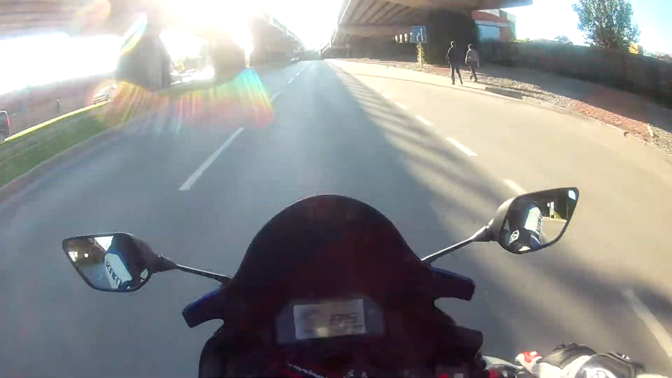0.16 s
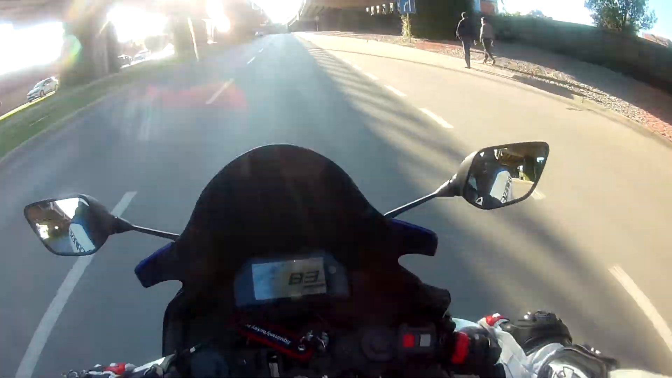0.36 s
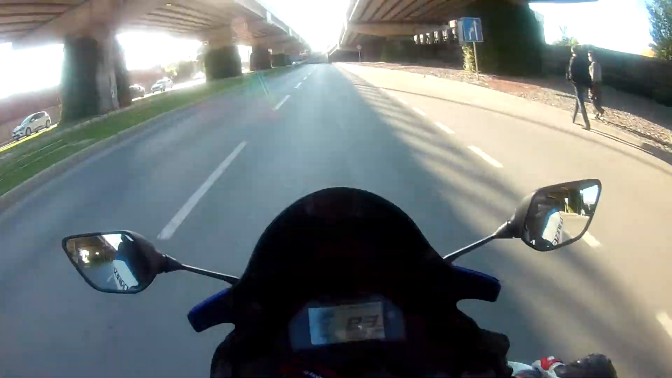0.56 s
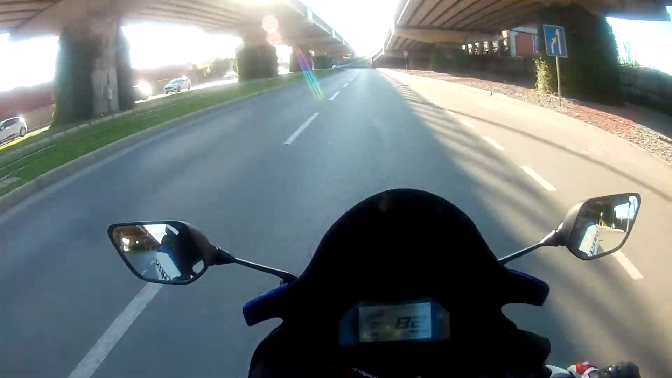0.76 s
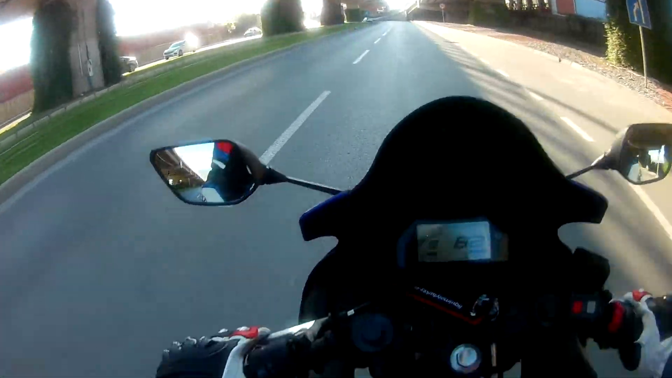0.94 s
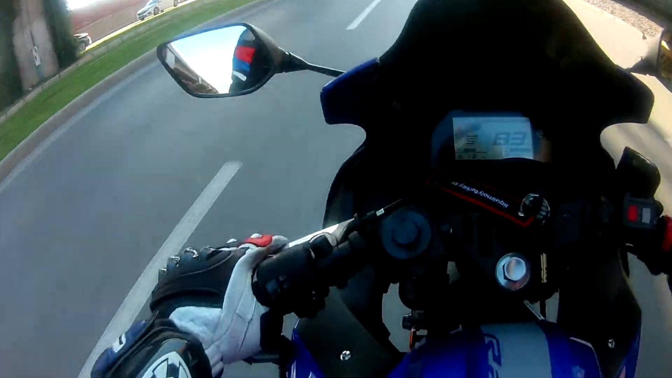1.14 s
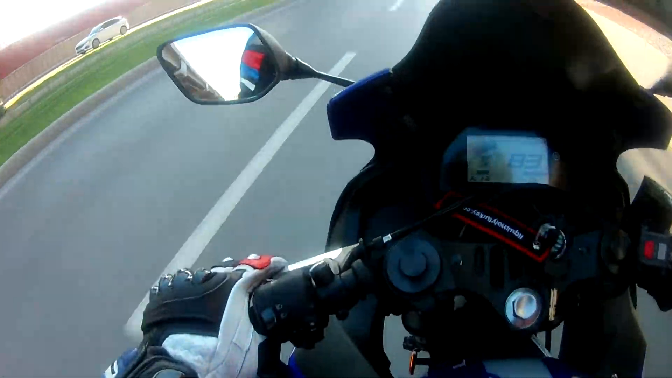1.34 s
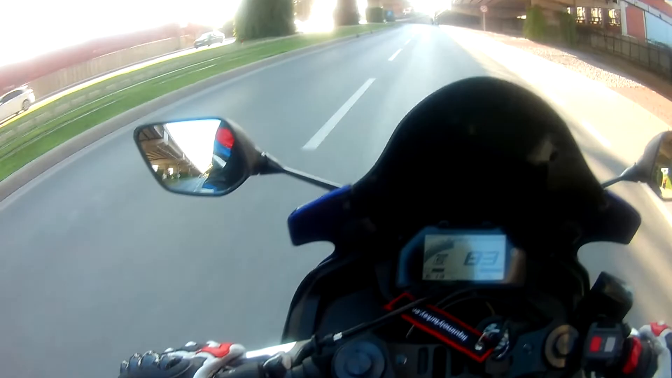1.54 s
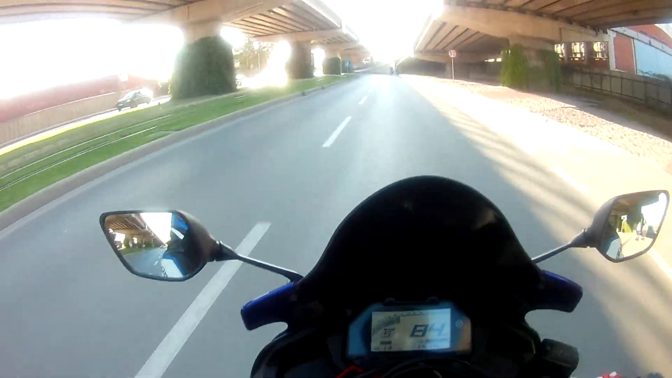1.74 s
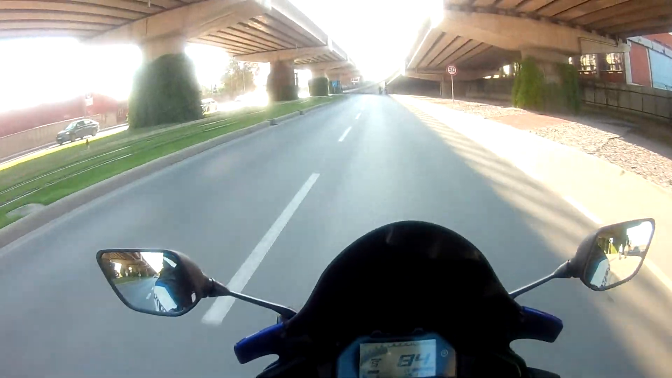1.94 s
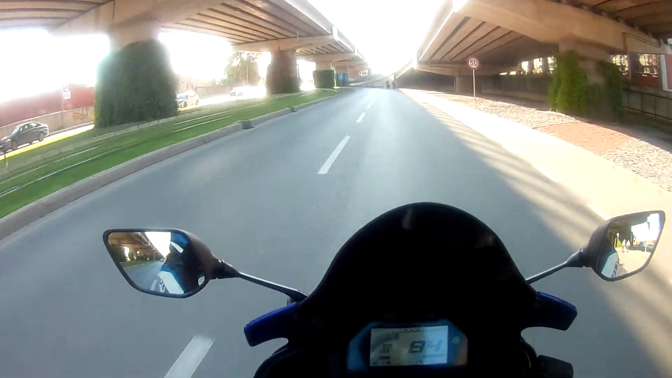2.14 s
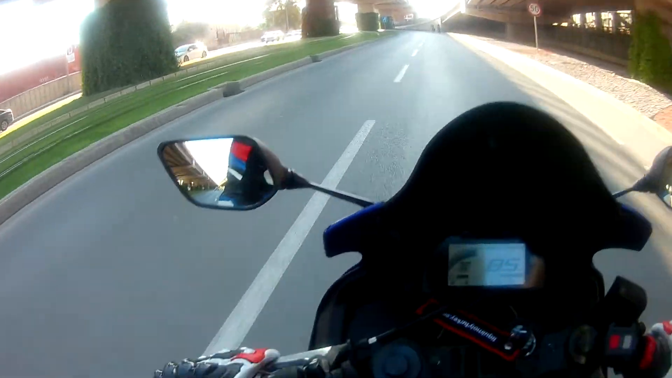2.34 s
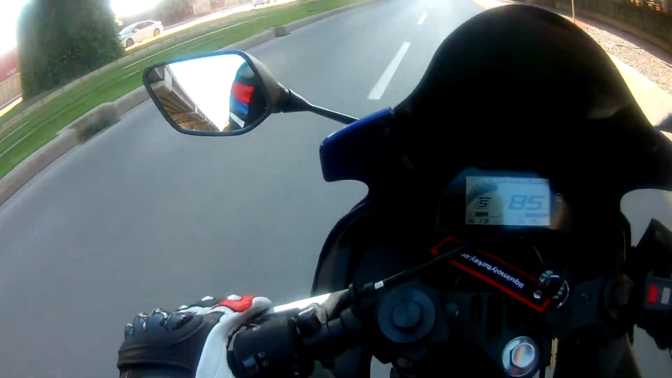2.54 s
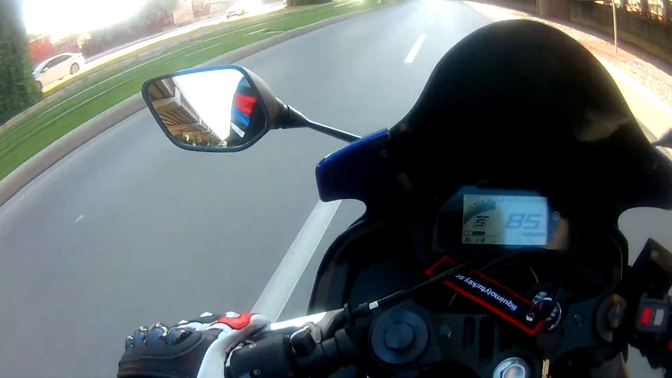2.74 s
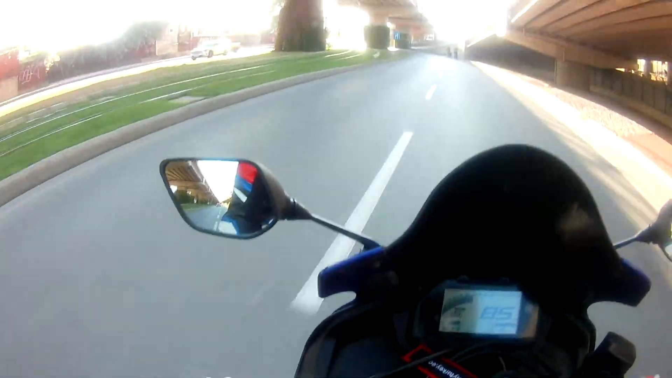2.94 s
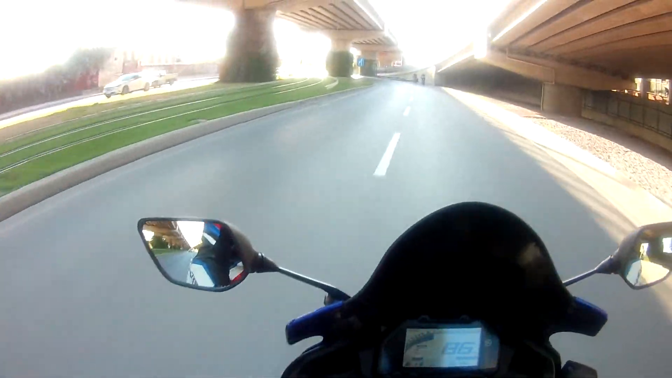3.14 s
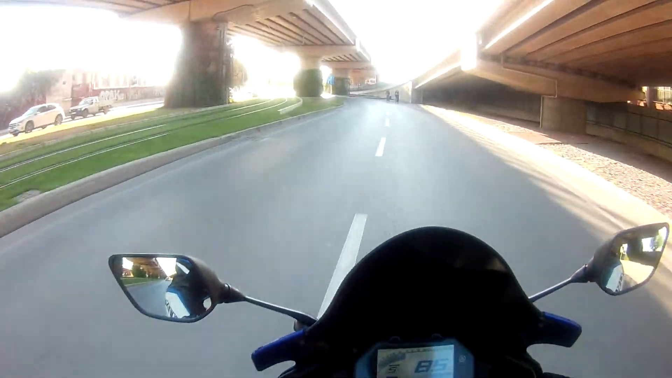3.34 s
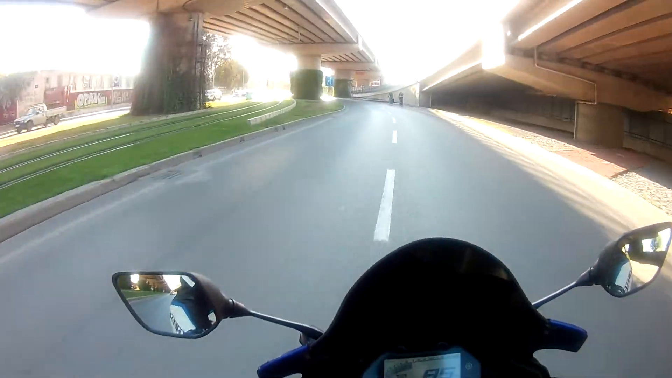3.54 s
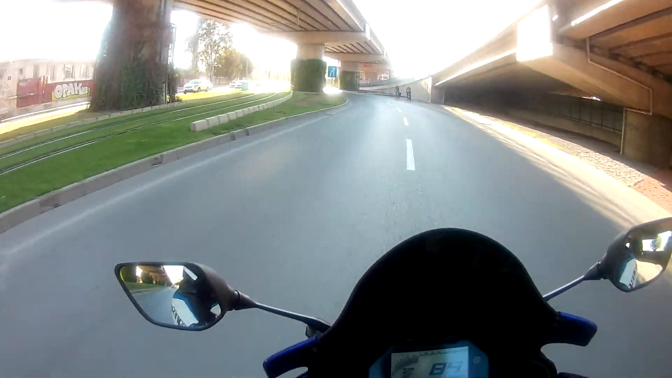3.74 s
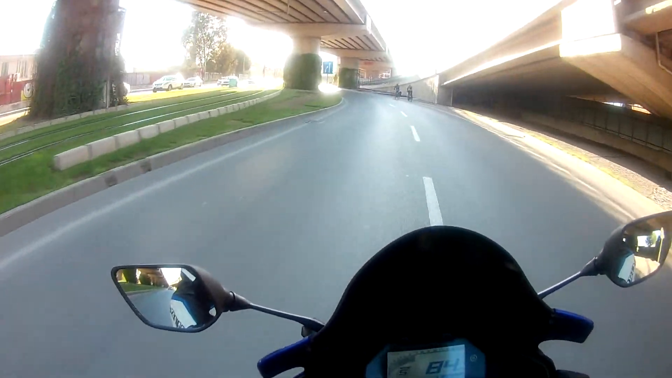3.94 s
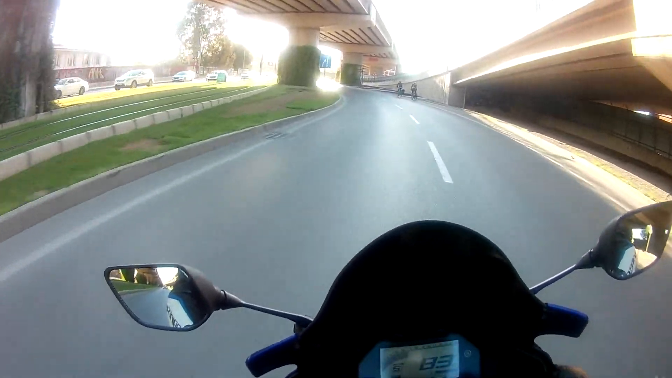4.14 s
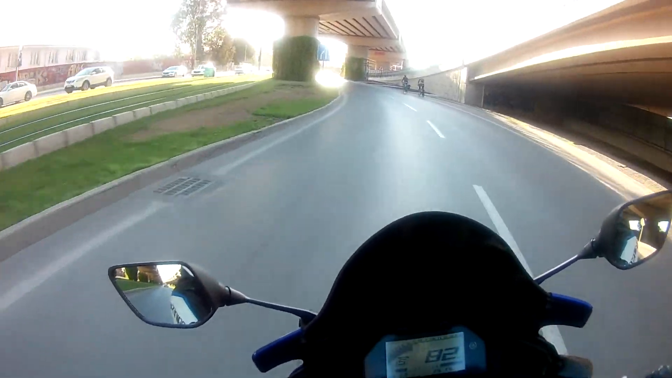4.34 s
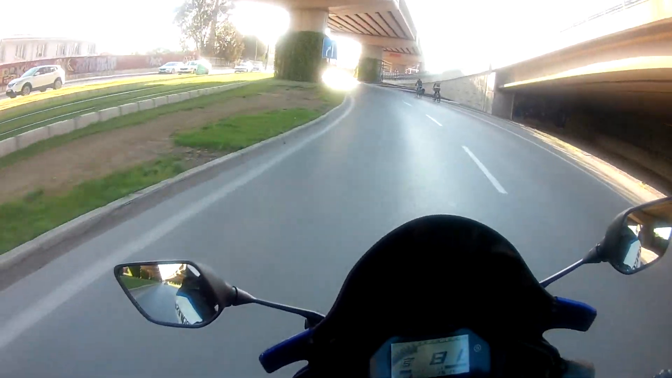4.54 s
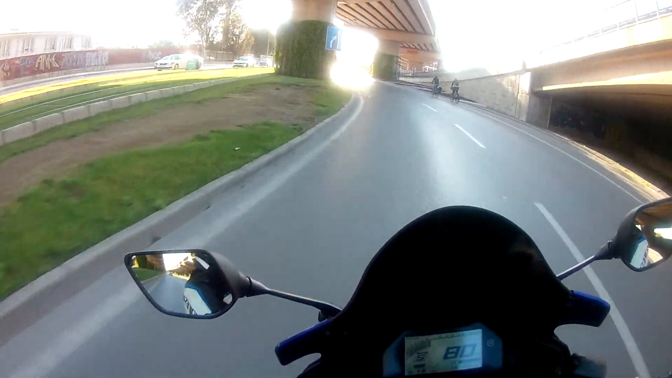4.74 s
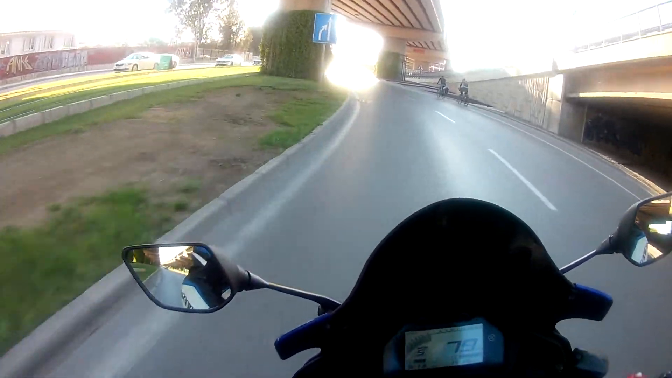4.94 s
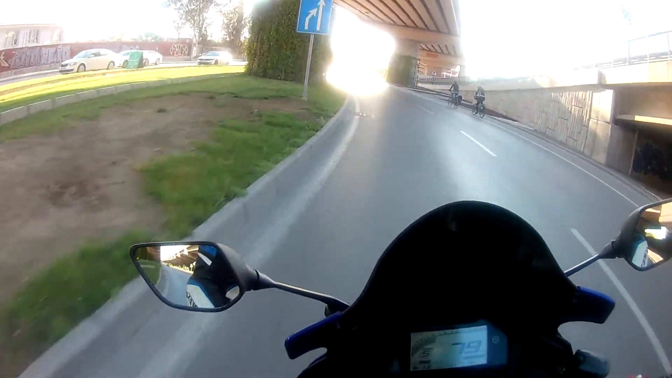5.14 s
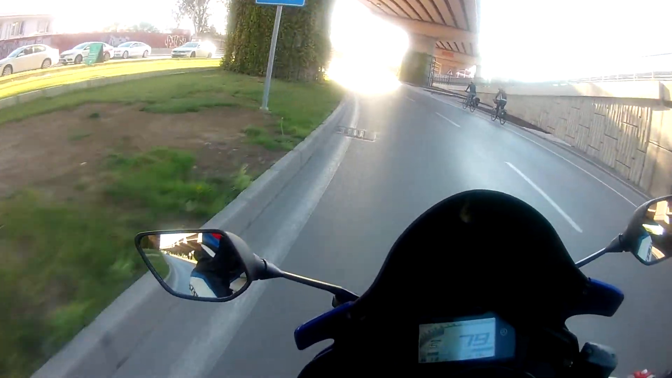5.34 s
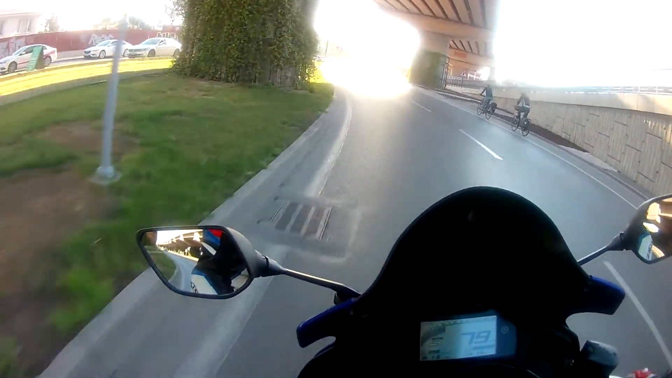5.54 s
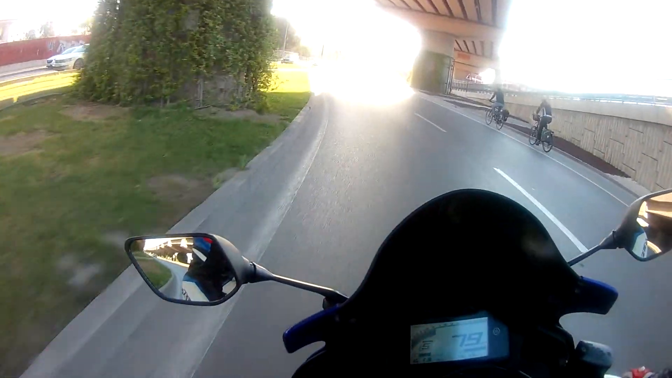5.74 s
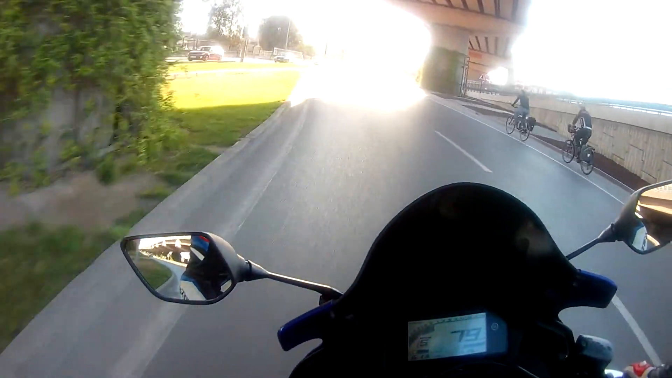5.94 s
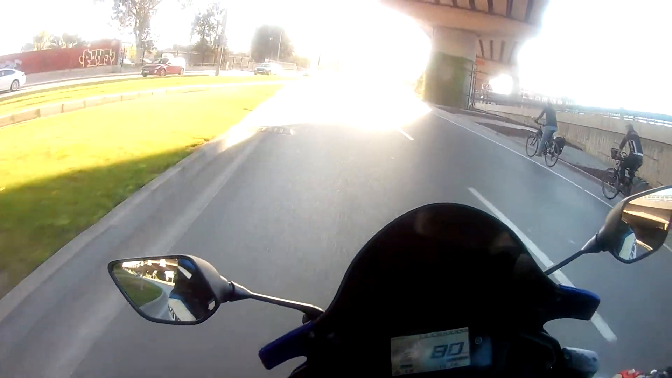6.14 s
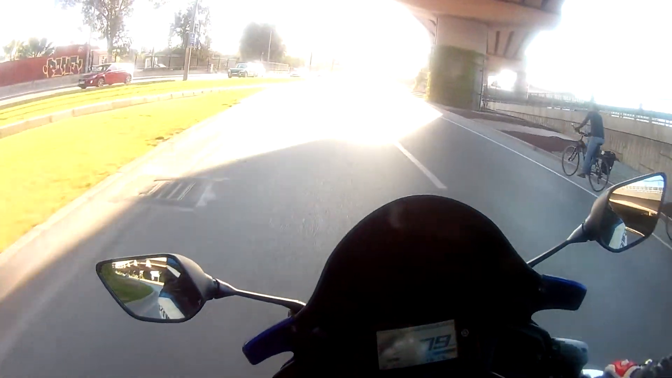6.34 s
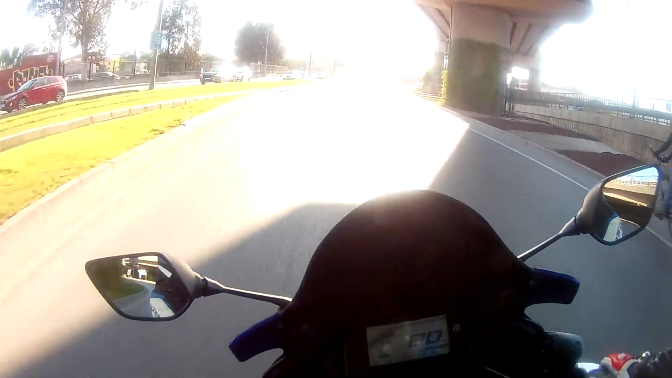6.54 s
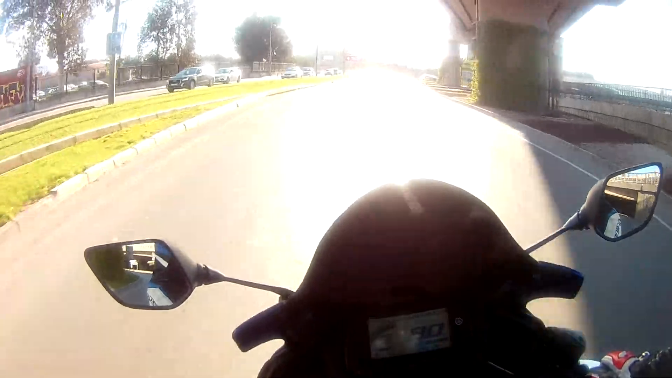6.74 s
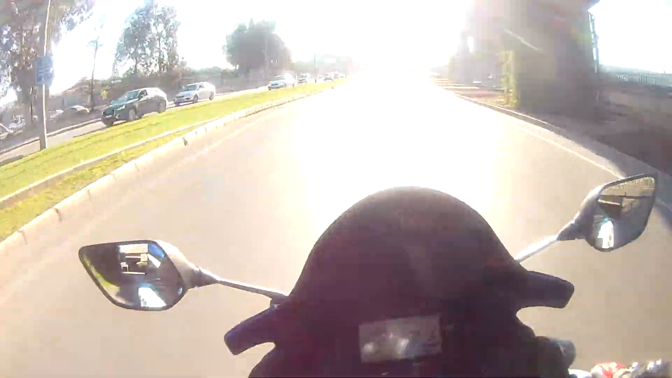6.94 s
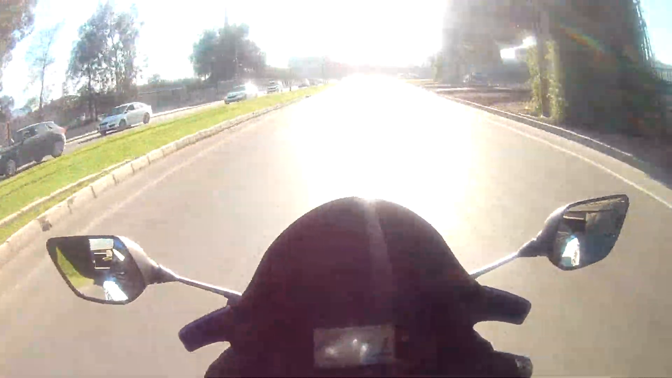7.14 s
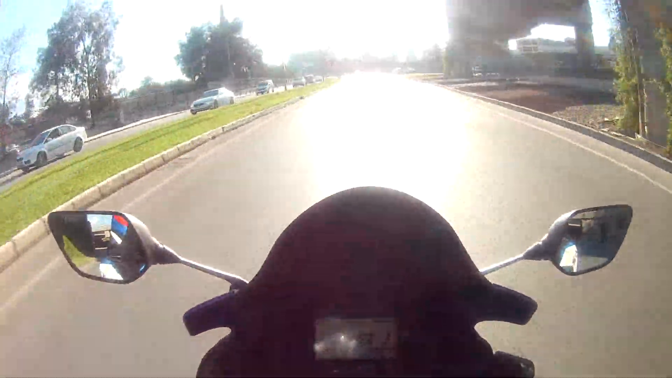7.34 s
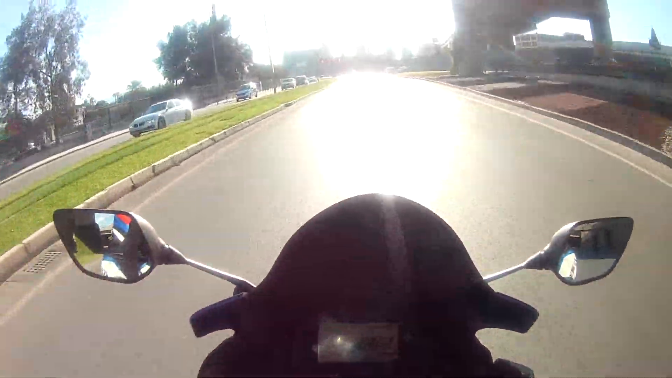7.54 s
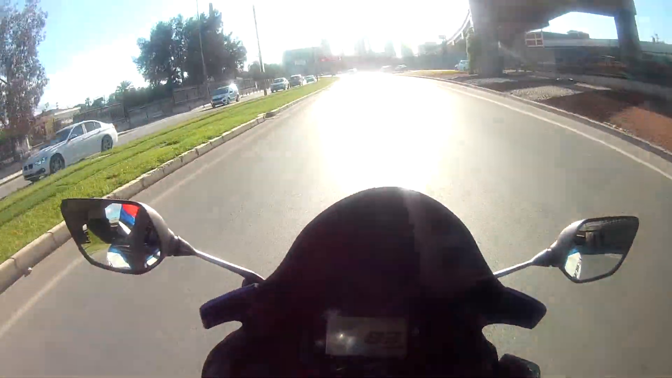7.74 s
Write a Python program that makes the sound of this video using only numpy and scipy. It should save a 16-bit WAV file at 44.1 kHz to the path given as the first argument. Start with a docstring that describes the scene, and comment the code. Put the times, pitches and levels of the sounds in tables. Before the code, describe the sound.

A gusty roar of air and irregular dull thumps hit a microphone in a closed, slightly ringing housing on a motorcycle rider's helmet. The engine drones low beneath it, with no clear note. Early on, the wind surges twice, hissing and howling at its loudest, then settles into a steadier rush. Faint howls and a thin, wavering whistle pass through, and lower howls follow as the ride continues.

```python
"""Wind on a motorcycle at steady speed, heard by a helmet camera in a closed, ringing housing.
From the start the air thumps the helmet, roars over it and hisses at the microphone opening, with
the engine a blurred drone underneath. At about 1 s and 2.4 s the head tips down into the air coming
off the windscreen, and the wind hisses and howls hardest. From about 5 to 6 s there are softer howls
and a thin whistle; two low howls come in near 7 s."""
import sys
import numpy as np
from scipy import signal
from scipy.fft import rfft, irfft, next_fast_len
from scipy.io import wavfile
from scipy.ndimage import uniform_filter1d, map_coordinates

SR = 44100
rng = np.random.default_rng(int(sys.argv[2]) if len(sys.argv) > 2 else 0)


def transcribe(signal):
    """Save signal, clipped to [-1, 1], as a 16-bit WAV file at the path in sys.argv[1]."""
    frames = np.atleast_2d(signal).T
    limited = np.clip(frames, -1, 1)
    pcm = np.round(limited * 32767).astype(np.int16)
    wavfile.write(sys.argv[1], SR, pcm)


N = 343539

# the airstream over time: t/s, strength/dB, deep bass level/dB, engine drone level/dB
AIRSTREAM = [(0, -28.5, -39, -28), (0.22, -30, -40, -34.5), (0.45, -29, -32, -30.5),
             (0.78, -26.5, -35, -33.5), (1.0, -24, -28, -24), (1.15, -23, -25.5, -23.5),
             (1.42, -20.5, -24, -21.5), (1.58, -23, -22.5, -22.5), (1.72, -24, -30, -25),
             (2.12, -26, -32, -28), (2.33, -24.5, -38, -26), (2.45, -23, -28, -23.5),
             (2.72, -21, -20, -26.5), (2.9, -23.5, -22, -27.5), (3.2, -26, -34.5, -29.5),
             (3.65, -26, -36.5, -27.5), (4.1, -26.5, -34, -29), (4.85, -27.5, -33.5, -33),
             (5.12, -28.5, -29.5, -28), (5.45, -28, -34, -29), (5.92, -25, -31.5, -27.5),
             (6.3, -25.5, -31.5, -29.5), (6.7, -25, -30, -27.5), (7.35, -26.5, -30, -29.5),
             (7.79, -24.5, -33.5, -30)]


def wind():
    """Swirling air makes seven bands of noise that follow the gusts; a tipped head feeds the hiss."""
    # the tone colour of each band, from lowest to highest: f/Hz, relative level/dB
    buffet = [(12, -29), (25, -15), (40, -2.5), (65, -3), (85, -6.5), (110, -11.5), (160, -37)]
    roar = [(90, -16), (160, -2.5), (220, -1.5), (350, -5), (450, -8), (600, -30.5), (800, -39.5)]
    body = [(300, -19), (420, -5.5), (550, 0), (750, -2), (900, -4), (1050, -13), (1400, -36)]
    rush = [(700, -30), (950, -7), (1200, 0), (1700, -1.5), (2000, -6.5), (2400, -18), (2900, -23),
            (3600, -30.5), (4500, -51)]
    hiss = [(2000, -37), (2400, -12), (2800, -7.5), (3600, -0.5), (4400, -5), (5000, -27.5), (6200, -24),
            (7400, -38)]
    fizz = [(3800, -25), (4600, 3), (5100, -2), (6200, -2), (6900, -8.5), (7600, -26)]
    air = [(5800, -24), (6800, -0.5), (7400, 0), (9500, -8.5), (11500, -9.5), (13300, -24), (15000, -34)]
    strength_db, bass_db, _ = curves(AIRSTREAM)
    gust_db, bass_rise_db = strength_db + 26, bass_db + 32  # how far above their usual levels
    tip = head_tip()
    swirls, flutter = wobble(14), wobble(35)
    bands = [  # level/dB, tone colour, patchiness/dB
        (bass_db + 0.49 * swirls, buffet, 0.75),
        (-29.5 + 0.82 * gust_db + 0.25 * bass_rise_db + 0.91 * swirls, roar, -0.14),
        (-29 + 1.18 * gust_db - 1.4 * tip + 1.14 * swirls, body, -0.18),
        (-29 + 0.91 * gust_db + 0.71 * tip + 0.29 * swirls + 0.4 * flutter, rush, 0.55),
        (-43.5 + 1.18 * gust_db + 2.8 * tip + swirls + 0.53 * flutter, hiss, 0.46),
        (-58.5 + 1.1 * gust_db + 0.89 * tip + 0.3 * swirls + 0.62 * flutter, fizz, 0.5),
        (-65.5 + 1.5 * gust_db + 1.2 * tip + 0.15 * swirls + 0.9 * flutter, air, 1.0)]
    return sum(amp(db) * turbulence(colour, patchy_db) for db, colour, patchy_db in bands)


def head_tip():
    """How far the head is down in the airstream, from 0 to 1; short tips move faster."""
    # each tip of the head: start/s, end/s, depth/0-1
    tips = [(1.04, 1.5, 1), (1.49, 1.607, 0.45), (2.39, 2.52, 0.7), (2.52, 2.9, 0.84)]
    rise_fall_s = [0.076, 0.087]
    return sum(depth * swell(start, end, *np.minimum((end - start) / 3, rise_fall_s))
               for start, end, depth in tips)


def thumps():
    """Each strong swirl of air hits the helmet with about one soft swing of pressure."""
    # the strongest swirls: middle t/s, level/dB, f/Hz
    hits = [(.137, -19.5, 120), (.413, -15.5, 70), (1.055, -9.5, 94), (1.174, -8, 85), (1.334, -8.5, 60),
            (1.477, -8.5, 110), (1.554, -7, 58), (2.386, -15, 110), (2.437, -8.5, 95), (2.693, -10, 120),
            (2.813, -13, 62), (3.042, -11.5, 80), (3.308, -11.5, 97), (3.49, -16.5, 125),
            (4.016, -14.5, 110), (4.465, -14, 115), (5.034, -14, 110), (5.162, -16.5, 101),
            (5.56, -16.5, 120), (5.886, -15.5, 90), (6.005, -9.5, 75.4), (6.157, -14, 99),
            (6.377, -12.5, 108), (7.506, -19, 55)]
    out = np.zeros(N + SR)
    for t, db, hz in hits:
        cycles = np.arange(-SR // hz, SR // hz) * hz / SR
        swing = np.sin(-2 * np.pi * cycles) * np.exp(-(cycles / 0.4) ** 2)
        start = round(t * SR - SR // hz)
        out[start:start + len(swing)] += amp(db) * swing
    return out[:N]


def howls():
    """The airstream howls in narrow bands, when the head tips and at a few other moments."""
    # howls with the head fully down: f/Hz, width/Hz, level/dB
    tip_howls = [(955, 190, -30), (1420, 80, -33), (2330, 600, -46.5), (3380, 370, -37.5),
                 (3890, 520, -40.5), (7300, 900, -59), (9300, 1700, -64)]
    # howls that come and go on their own: start/s, end/s, f/Hz, width/Hz, level/dB
    passing_howls = [(0.0, 1.0, 3400, 200, -55), (2.94, 3.16, 5450, 350, -60), (4.9, 5.6, 3390, 250, -50.5),
                     (4.9, 5.9, 1360, 140, -39.5), (5.301, 5.71, 228, 35, -35), (7, 7.4, 1396, 55, -35),
                     (6.9, 7.79, 540, 140, -36.5)]
    tipped = head_tip() * sum(amp(db) * narrow_noise(hz, width) for hz, width, db in tip_howls)
    passing = sum(amp(db) * swell(start, end, rise_s=0.079, fall_s=0.079) * narrow_noise(hz, width)
                  for start, end, hz, width, db in passing_howls)
    return tipped + passing


def engine():
    """The engine fires too unevenly for a clear note: a low drone that the gusts pump up and down."""
    # the drone's tone colour: f/Hz, relative level/dB
    drone = [(60, -29), (85, -4), (118, -0.5), (135, -3.5), (165, -10), (220, -24.5)]
    _, _, drone_db = curves(AIRSTREAM)
    return amp(drone_db + 0.79 * wobble(22)) * turbulence(drone, patchy_db=-0.34)


def whistle():
    """A thin, slightly wavering tone that shows for a moment."""
    level = swell(5.15, 6.05, rise_s=0.14, fall_s=0.14) * amp(-43 + 1.5 * wobble(9))
    pitch_hz = 1647 + 3 * wobble(12)
    return np.sqrt(2) * level * np.sin(2 * np.pi * np.cumsum(pitch_hz) / SR)


def housing(hz):
    """The closed housing rings: it boosts some frequencies and weakens a few."""
    # its fixed peaks (+) and dips (-): f/Hz, width/Hz, gain/dB
    resonances = [(520, 33, 4), (1317, 154, 8), (1388, 70, 3), (3306, 290, 8), (3895, 200, 7.5),
                  (4400, 100, -3), (5630, 150, 4.5), (6260, 300, 3.5), (9000, 450, 1), (13350, 400, -3)]
    return amp(sum(db * bell(hz, centre, width) for centre, width, db in resonances))


def turbulence(colour, patchy_db):
    """Coloured noise with random louder and softer patches, heard inside the housing; level 1."""
    spectrum = signal.stft(rng.standard_normal(N), nperseg=512)[2]
    patches = uniform_filter1d(rng.standard_normal(spectrum.shape), size=5, axis=0)  # blur in frequency
    patches = uniform_filter1d(patches, size=12, axis=1)  # blur in time
    noise = signal.istft(spectrum * amp(patchy_db * unit(patches)), nperseg=512)[1][:N]
    colour_hz, colour_db = np.transpose(colour)
    tone = lambda hz: amp(np.interp(np.log(hz + 1), np.log(colour_hz), colour_db, left=-120, right=-120))
    return unit(filtered(noise, lambda hz: tone(hz) * housing(hz)))


def narrow_noise(centre_hz, width_hz):
    """Noise close to one pitch, at level 1."""
    return unit(filtered(rng.standard_normal(N), lambda hz: np.exp(-(2 * (hz - centre_hz) / width_hz) ** 2)))


def bell(hz, centre_hz, width_hz):
    """A bell-shaped bump, 1 at its centre."""
    return 1 / (1 + (2 * (hz - centre_hz) / width_hz) ** 2)


def swell(start, end, rise_s, fall_s):
    """A straight fade from 0 to 1 and back, between start and end."""
    t = np.arange(N) / SR
    return np.clip(np.minimum((t - start) / rise_s, (end - t) / fall_s), 0, 1)


def wobble(rate):
    """A smooth curve through `rate` random points a second."""
    return map_coordinates(rng.standard_normal(int(N * rate / SR) + 4), [np.arange(N) * rate / SR])


def curves(rows):
    """One value per sample for each column after the time."""
    times, *columns = np.transpose(rows)
    return [np.interp(np.arange(N) / SR, times, column) for column in columns]


def filtered(x, gain):
    """Scale each frequency in x by gain(hz)."""
    size = next_fast_len(len(x) + 8192, real=True)
    return irfft(rfft(x, size) * gain(np.fft.rfftfreq(size, 1 / SR)), size)[:len(x)]


def amp(db):
    """Turn decibels into a multiplier."""
    return 10 ** (np.asarray(db) / 20)


def unit(x):
    """Scale x to an average (rms) level of 1."""
    return x / np.sqrt(np.mean(x ** 2) + 1e-20)


def scene():
    """All the sources together in one channel."""
    return (wind() + howls() + thumps() + engine() + whistle())[None]


def record(dry):
    """The camera drops one narrow treble band, adds faint electronic hiss and cuts the extremes."""
    low_cut_hz, top_hz = 23, 15750
    hiss = filtered(rng.standard_normal(N), lambda hz: amp(-76 - 3 * bell(hz, 13350, width_hz=500)))
    notched = filtered(dry[0], lambda hz: amp(-36 * bell(hz, 7965, width_hz=260)))
    low_cut = lambda hz: hz ** 2 / np.sqrt(hz ** 4 + low_cut_hz ** 4)
    return filtered(notched + hiss, lambda hz: low_cut(hz) * (hz < top_hz))[None]


dry = scene()
out = record(dry)
transcribe(out)
```